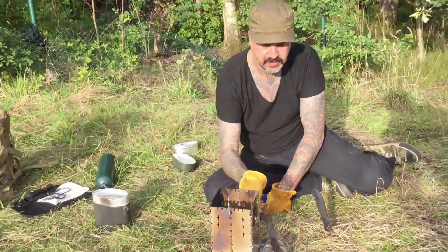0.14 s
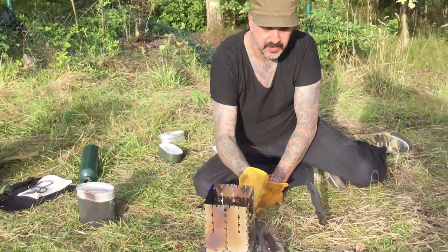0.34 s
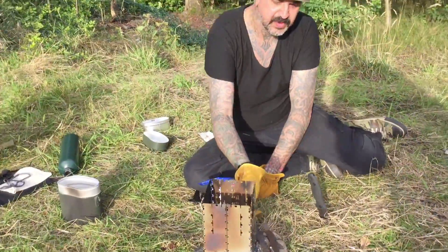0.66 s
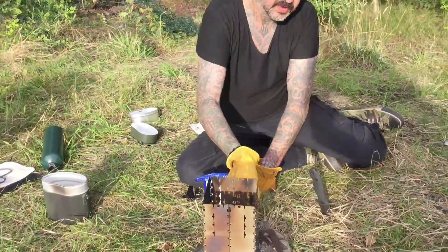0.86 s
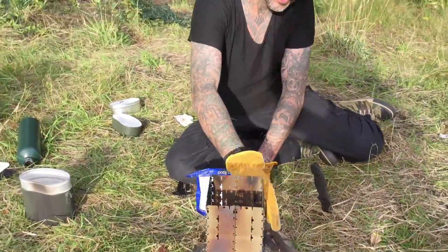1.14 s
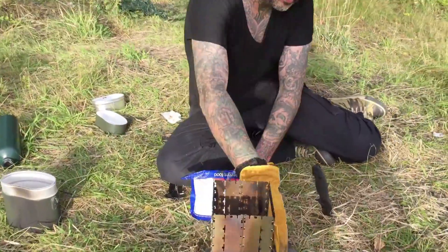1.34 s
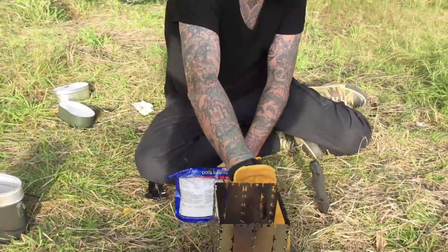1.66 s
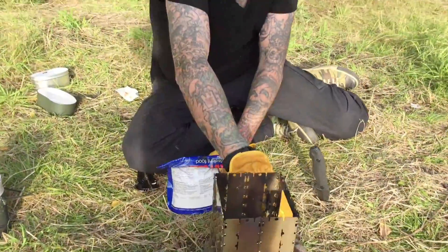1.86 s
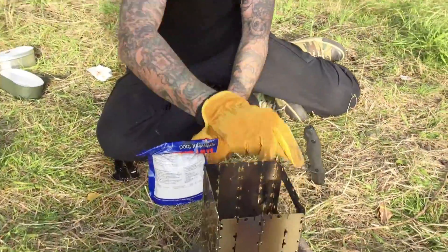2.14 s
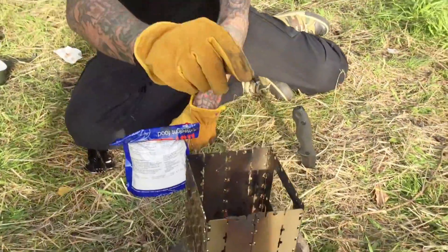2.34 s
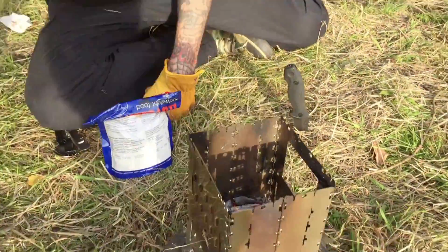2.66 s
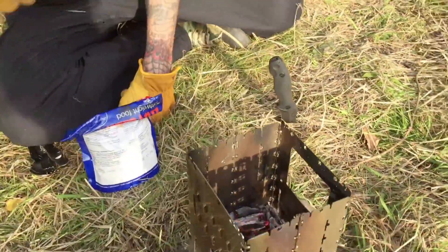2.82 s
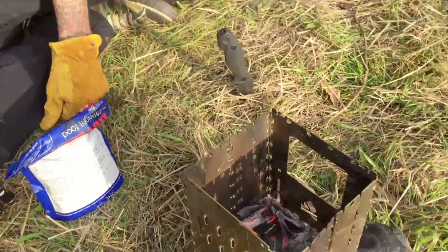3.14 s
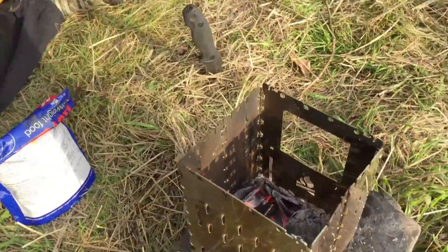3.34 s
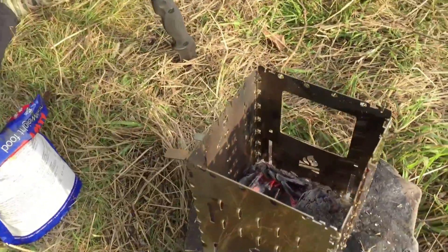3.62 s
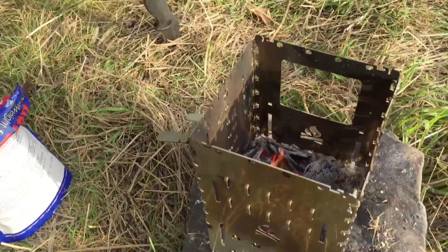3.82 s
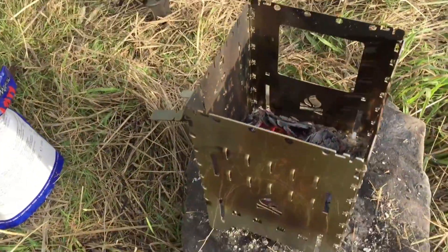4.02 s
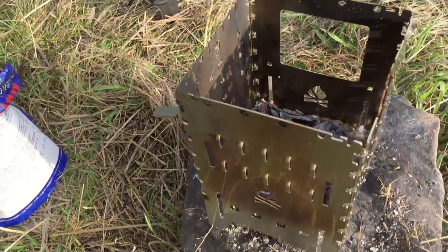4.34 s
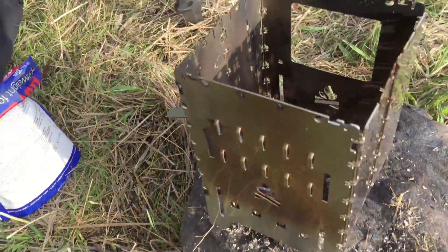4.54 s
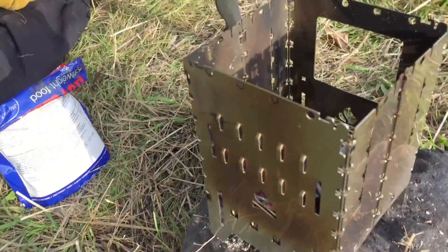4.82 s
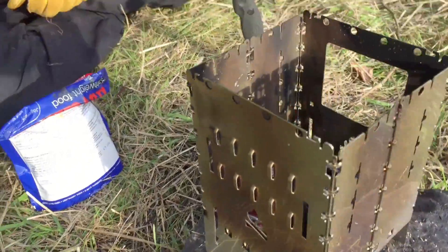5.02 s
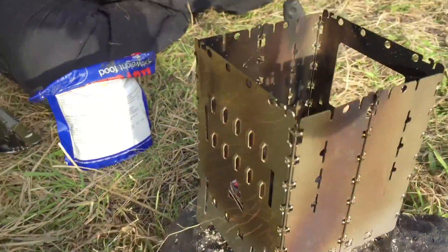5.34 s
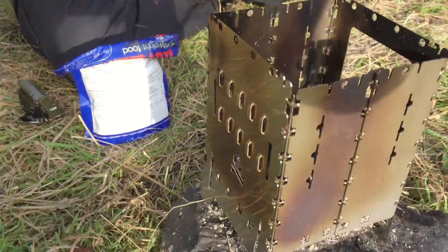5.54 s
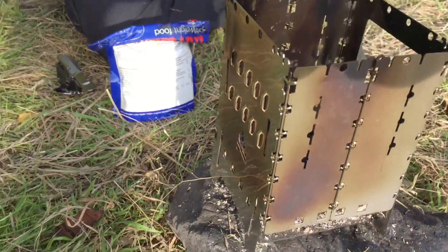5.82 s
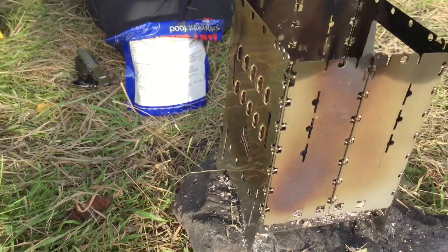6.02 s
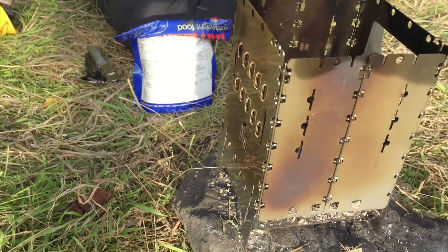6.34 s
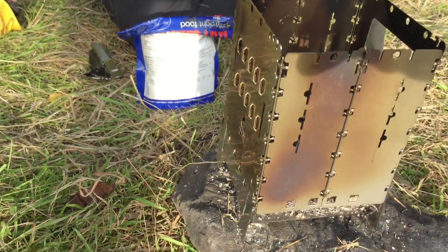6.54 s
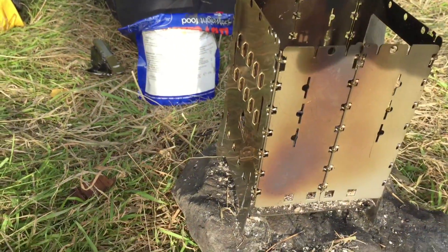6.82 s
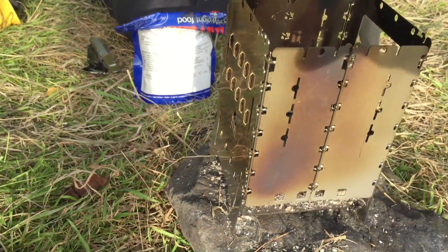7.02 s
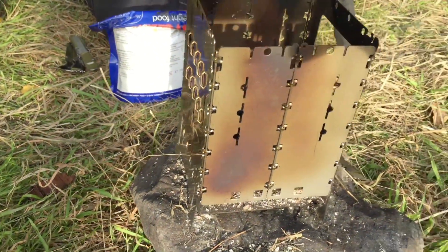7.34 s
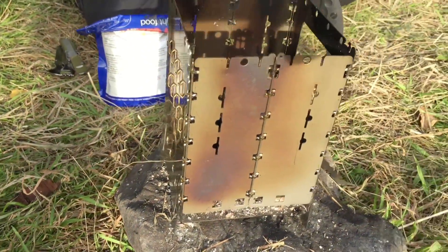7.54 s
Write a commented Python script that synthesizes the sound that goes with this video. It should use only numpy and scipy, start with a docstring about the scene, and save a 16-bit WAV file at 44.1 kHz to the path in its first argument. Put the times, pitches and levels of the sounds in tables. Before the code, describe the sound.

Close rustles, dull knocks and light metallic clinks in a grassy field full of insects and birdsong, the chorus slowly dying away over low traffic.

```python
"""In a meadow by a wood, heard through two capsules: a wide chorus of insects and echoing birds dies away.
Close by and dead ahead, gloved hands rustle, knock and clink a steel stove, embers tick, far traffic rumbles.
Insects, traffic, air and cloth are coloured noise; birds are gliding whistles scattered by the trees;
ticks are tiny snaps with a short body, knocks and clinks are decaying modes."""
import sys
import numpy as np
from scipy import signal
from scipy.fft import rfft, irfft, next_fast_len
from scipy.io import wavfile
from scipy.ndimage import uniform_filter1d, map_coordinates

SR = 44100
rng = np.random.default_rng(int(sys.argv[2]) if len(sys.argv) > 2 else 0)


def master_out(mix):
    """Clip the mix to full scale and print it as 16-bit PCM to the path in sys.argv[1]."""
    frames = np.transpose(np.atleast_2d(mix))
    ceiling = np.clip(frames, -1, 1)
    pcm = np.round(ceiling * 32767).astype(np.int16)
    wavfile.write(sys.argv[1], SR, pcm)


N = 338435
T = np.arange(N) / SR  # seconds


def amp(db):
    """dB to gain."""
    return 10 ** (np.asarray(db) / 20)


def unit(x):
    """Scale to rms 1."""
    return x / np.sqrt(np.mean(x ** 2) + 1e-20)


def along(points, hz):
    """Read (Hz, value) points on a log frequency axis."""
    f, v = np.transpose(points)
    return np.interp(np.log(hz + 1), np.log(f + 1), v)


def curves(rows):
    """One value per sample for each column after the time."""
    s, *cols = np.transpose(rows)
    return [np.interp(T, s, c) for c in cols]


def wobble(rate, size=N):
    """A smooth random curve, rate knots a second."""
    knots = rng.standard_normal(int(size * rate / SR) + 4)
    return map_coordinates(knots, [np.arange(size) * rate / SR])


def sine(hz, t, phase=0):
    """A steady tone with an optional moving phase in radians."""
    return np.sin(2 * np.pi * hz * t + phase)


def gliding_sine(hz):
    """A tone whose frequency changes from sample to sample."""
    return np.sin(2 * np.pi * np.cumsum(hz) / SR)


def filtered(x, response):
    """x times a response of frequency."""
    m = next_fast_len(N + SR // 2)
    return irfft(rfft(x, m) * response(np.fft.rfftfreq(m, 1 / SR)), m)[..., :N]


def rush(spectrum, patchy_db, channels=1, grain_db=0):
    """Coloured noise of rms 1 with patches of random gain; grain makes single samples stand out."""
    grain = amp(grain_db * rng.exponential(size=(channels, N)))
    white = rng.standard_normal((channels, N)) * grain
    z = signal.stft(white, nperseg=512)[2]
    field = rng.standard_normal(z.shape[1:])
    field = uniform_filter1d(uniform_filter1d(field, 5, 0), 10, 1)  # over frequency, then time
    x = signal.istft(z * amp(patchy_db * unit(field)), nperseg=512)[1][:, :N]
    return unit(filtered(x, lambda hz: amp(along(spectrum, hz))))


def add(track, s, sound):
    """Mix a sound in at s seconds."""
    part = track[..., round(s * SR):][..., :sound.shape[-1]]
    part += sound[..., :part.shape[-1]]


# Colour of the open air. Each row: frequency in Hz, relative level per hertz in dB.
AIR_SPECTRUM = [(150, -24), (250, -6), (297, -13), (347, -14), (543, -13), (668, -14.5), (754, -15),
                (1050, -11), (2750, -17), (4010, -19), (7590, -38), (11300, -23.5), (15300, -47),
                (15500, -70)]


def air():
    """A steady hiss, mostly common to both capsules; the part that differs lacks bass."""
    mid, side = rush(AIR_SPECTRUM, patchy_db=2.0, channels=2)
    side = amp(-12) * filtered(side, lambda hz: 1 / (1 + (330 / (hz + 1)) ** 4))
    return amp(-65.0) * np.array([mid + side, mid - side])


# Colour of the far rumble. Each row: frequency in Hz, relative level per hertz in dB.
RUMBLE_SPECTRUM = [(13, -37), (22, -32), (35, -8), (54, 7), (65, 7), (97, -5), (130, -4), (170, -59),
                   (290, -120)]
# Colour of the higher drone. Each row: frequency in Hz, relative level per hertz in dB.
DRONE_SPECTRUM = [(53, -6), (90, -2.5), (167, 3), (241, -7), (269, -11), (420, -21.5), (550, -76),
                  (920, -120)]
# Uneven level of the low rumble and drone. Each row: time in seconds, rumble level in dB, drone level in dB.
RUMBLE_LEVELS = [(0, -50.5, -58), (.6, -56.5, -58.5), (1.1, -57.5, -62.5), (1.9, -54.5, -60),
                 (2.5, -53, -60), (3, -55, -56), (3.6, -59, -61), (4.3, -51.5, -60), (4.48, -53, -60),
                 (4.56, -54, -53.5), (4.64, -57, -61.5), (5, -57, -60), (5.4, -56.5, -59),
                 (6, -53.5, -59.5), (6.6, -59, -60), (7.1, -56.5, -59.5), (7.67, -55, -55.5)]


def traffic():
    """Far traffic, alike at both capsules: a lumpy low rumble and a higher drone that shares some lumps."""
    lumps_db = 4 * wobble(11)
    rumble_db, drone_db = curves(RUMBLE_LEVELS)
    rumble = amp(rumble_db + lumps_db) * rush(RUMBLE_SPECTRUM, patchy_db=0.0)
    drone_level = amp(drone_db + 0.23 * lumps_db + 1.4 * wobble(9))
    return rumble + drone_level * rush(DRONE_SPECTRUM, patchy_db=3.5)


HUM_S, HUM_LENGTH_S, HUM_DB = 6.5, .75, -51  # level before the arch and throb
HUM_LOW_HZ, HUM_RISE_HZ = 136, 41.9
HUM_THROB_S, HUM_THROB_FIRST_S = 0.142, 7.08  # throb period, time of one throb peak


def hum():
    """One short low tone of no clear source: its pitch arches and wavers, its level throbs."""
    u = np.clip((T - HUM_S) / HUM_LENGTH_S, 0, 1)
    arch = np.sin(np.pi * u)
    throb = np.cos(np.pi * (T - HUM_THROB_FIRST_S) / HUM_THROB_S) ** 2
    hum_hz = HUM_LOW_HZ + HUM_RISE_HZ * arch + 10 * wobble(18)
    level = amp(HUM_DB) * arch ** 0.69 * (0.18 + throb) * amp(3.1 * wobble(15))
    return level * gliding_sine(hum_hz)


# Colour of the far chorus by the wood. Each row: frequency in Hz, relative level per hertz in dB.
WOOD_SPECTRUM = [(60, -120), (100, -20), (150, -16.5), (250, -8), (500, -11), (750, -10.5), (1600, -5),
                 (2250, 2), (2900, 0), (3300, 0.5), (3600, -2.5), (4000, -3), (4300, -120)]
# Swells of that far chorus. Each row: time in seconds, change of level in dB.
WOOD_SWELLS = [(0, -4), (.15, 2.5), (.6, 0.5), (.95, -0.5), (1.2, -0.5), (1.55, -2), (1.9, 1), (2.3, 0),
               (2.75, -1.5), (3.05, 2), (3.45, -0.5), (3.8, 3.5), (4.3, -1.5), (4.9, 0), (5.2, 0.5),
               (5.8, 1), (7.67, 7)]
WOOD_DB = -58  # each capsule's own part, before swells and fade


def wood_chorus():
    """The far chorus swells; its long waves reach both capsules alike, its short waves do not."""
    far = rush(WOOD_SPECTRUM, patchy_db=1.2, channels=3)
    shared = filtered(far[2], lambda hz: 1 / (1 + (hz / 1500) ** 4))
    level = amp(WOOD_DB + curves(WOOD_SWELLS)[0] + 0.49 * wobble(5.5))
    return level * (far[:2] + 1.71 * shared)


# Colour of the blurred crickets. Each row: frequency in Hz, relative level per hertz in dB.
CRICKET_SPECTRUM = [(3700, -120), (3850, -19), (4000, -8), (4090, 6), (4300, 6), (4600, 6.5), (4800, 1.5),
                    (4950, -19), (5100, 3), (5300, -120)]
# Colour of the blurred cicadas. Each row: frequency in Hz, relative level per hertz in dB.
CICADA_SPECTRUM = [(2910, -47), (4950, -21), (5290, -6), (6510, -3), (6960, -6.5), (7580, -7.5),
                   (8220, -17.5), (10000, -30), (12000, -41), (15300, -41), (15500, -70)]
# Wing resonances of the nearest insects.
# Each row: centre in Hz, width in Hz, gain in dB, the last two before the response is squared.
NEAR_WINGS = [(4125, 70, -2), (6410, 160, 0), (7335, 110, -4)]
CRICKET_DB, CICADA_DB = -54, -51.5  # full chorus, before balance and fade


def wing_response(hz):
    """Sum of wing resonances, squared to steepen the skirts."""
    total = 0
    for centre, width, db in NEAR_WINGS:
        damping = 1j * hz * width
        total = total + amp(db) * damping / (centre * centre - hz * hz + damping)
    return total ** 2


def insects():
    """Countless singers blur into bands, unrelated left and right; the nearest ones still pulse through."""
    throb_db = 0.68 * sine(5.2, T, 2.0 * wobble(1.47))  # wing strokes come in bouts
    buzz_db = 0.54 * sine(68, T, 3.3 * wobble(8.1))  # tymbal beat
    cricket_level = amp(CRICKET_DB + 0.15 * wobble(2.74) + throb_db)
    crickets = cricket_level * rush(CRICKET_SPECTRUM, patchy_db=1.5, channels=2)
    cicada_level = amp(CICADA_DB + buzz_db + 0.173 * wobble(7.5) + 0.13 * wobble(22.08))
    cicadas = cicada_level * rush(CICADA_SPECTRUM, patchy_db=1.33, channels=2)
    near_noise = unit(filtered(rng.standard_normal((2, N)), wing_response))
    near = amp(CICADA_DB - 4.5 + 2 * buzz_db) * near_noise
    return crickets + near + amp([[1.4], [-1.4]]) * cicadas


def whine():
    """A very faint, thin high tone, alike at both capsules, wavering in level and phase."""
    return amp(CICADA_DB - 41 + 2.8 * wobble(6)) * sine(15626, T, 1.2 * wobble(25))


def note(length, first_hz, last_hz, warble_hz, bend):
    """A gliding whistle; fast random warble smears it into a trill, a bend above 1 hurries the glide."""
    size = round(length * SR)
    u = np.arange(size) / (length * SR)
    hz = first_hz + (last_hz - first_hz) * (1 - (1 - u) ** bend)
    hz += warble_hz * wobble(220, size)
    hz += 18 * wobble(14, size)  # no bird holds a pitch straight
    swell = np.clip(u / 0.15, 0, 1) * np.clip((1 - u) / 0.3, 0, 1)
    swell *= amp(2.2 * wobble(40, size))
    swell *= unit(amp(warble_hz / 55 * wobble(170, size)))  # a warbling throat also rasps
    return np.sqrt(2) * swell * gliding_sine(hz)


# How long the wood rings. Each row: frequency in Hz, time to fall by 60 dB in seconds.
TREE_DECAY = [(500, 0.29), (2900, 1), (3700, 0.44), (8000, 0.28)]


def trees(x):
    """Trunks scatter each note into a noisy tail; each frequency dies at its own speed."""
    hz, t, z = signal.stft(rng.standard_normal((2, SR // 2)), SR, nperseg=256)
    decay = amp(-60 * t / along(TREE_DECAY, hz)[:, None])
    tail = signal.istft(z * decay, SR, nperseg=256)[1]
    return signal.fftconvolve(x[None], tail / np.linalg.norm(tail[0]), axes=1)


# Whistles. Each row: start in seconds, length in seconds, first and last pitch in Hz,
# level in dB before panning, depth of random warble in Hz, left-right balance in dB.
WHISTLE_NOTES = [(0.04, 0.062, 2895, 2860, -54, 40, -2), (0.065, 0.047, 3000, 3460, -51.5, 100, 0),
                 (0.093, 0.035, 2215, 2750, -49, 50, -1), (0.298, 0.03, 2750, 2600, -52, 80, 1),
                 (0.365, 0.1, 2610, 2650, -53, 35, 4), (0.316, 0.097, 3290, 3310, -54.5, 37, -1),
                 (0.44, 0.17, 2120, 2027, -61.5, 30, -6), (0.64, 0.08, 2717, 2745, -48, 47, 2),
                 (0.68, 0.068, 2090, 2060, -64, 40, -2), (0.705, 0.09, 2633, 2530, -51.5, 82, 0),
                 (0.805, 0.028, 2834, 2690, -50.5, 60, 0), (0.875, 0.033, 2897, 2620, -53, 59, 0),
                 (0.675, 0.046, 3110, 3160, -46.5, 65, 3), (0.76, 0.043, 3180, 3090, -55, 45, 0),
                 (0.92, 0.073, 2600, 2410, -54, 40, -1), (1.297, 0.2, 3157, 3050, -53.5, 66, 2),
                 (1.347, 0.088, 2630, 2656, -58, 31, -2), (1.36, 0.054, 3050, 3265, -50, 88, -3),
                 (1.778, 0.066, 2790, 2755, -56, 21, -6), (1.875, 0.025, 3320, 2950, -50, 90, 0),
                 (1.903, 0.057, 2880, 2773, -47.5, 58, 3), (1.99, 0.14, 2800, 2745, -54, 96, -3),
                 (1.949, 0.043, 3250, 2644, -47.5, 80, 3), (1.955, 0.056, 3210, 3180, -58, 56, -2),
                 (1.98, 0.075, 2280, 2210, -55, 71, -1), (2.11, 0.14, 2180, 2176, -65, 43, -4),
                 (2.365, 0.035, 3050, 3400, -50, 60, -2), (2.375, 0.045, 3200, 3250, -47.5, 84, 0),
                 (2.412, 0.042, 3290, 3660, -49.5, 8, 14), (2.446, 0.032, 3580, 3700, -44, 8, 15),
                 (2.454, 0.052, 2524, 2474, -48, 46, -3), (2.578, 0.064, 3860, 3740, -48, 6, 6),
                 (2.6, 0.05, 2530, 2580, -53, 51, -4), (2.646, 0.075, 3750, 3590, -44.5, 13, 8),
                 (2.73, 0.12, 2444, 2300, -55, 39, -1), (2.76, 0.1, 2706, 2750, -53, 70, 7),
                 (2.92, 0.044, 3150, 3440, -48.5, 80, 3), (2.955, 0.15, 3340, 3130, -56.5, 87, 0),
                 (2.985, 0.037, 2250, 2246, -52.5, 52, 0), (2.988, 0.073, 2540, 2574, -51, 35, 8),
                 (3.556, 0.13, 2830, 2860, -50.5, 47, -5), (4.198, 0.055, 1228, 1239, -49.5, 38, -9),
                 (4.115, 0.17, 1968, 1796, -56, 60, 0), (4.255, 0.19, 3570, 3580, -60, 15, 4),
                 (4.635, 0.075, 2400, 1780, -60, 27, -3), (5.535, 0.08, 3900, 3850, -56, 60, 3),
                 (2.52, 0.045, 4250, 3950, -57, 97, 3), (4.27, 0.12, 3065, 2950, -56, 83, -5),
                 (4.405, 0.13, 1950, 1904, -55.5, 120, -4), (4.325, 0.17, 2403, 2347, -56, 8, -7),
                 (4.613, 0.042, 1128, 1330, -51, 18, -5), (4.655, 0.099, 2785, 2753, -50, 36, -5),
                 (4.856, 0.074, 2770, 2750, -52, 48, 1), (5.065, 0.049, 2390, 2485, -50, 36, -2),
                 (5.24, 0.088, 3170, 3360, -51, 36, 6), (5.305, 0.063, 2660, 2703, -48.5, 30, 1),
                 (5.41, 0.051, 2175, 2013, -50.5, 26, -4), (5.555, 0.066, 2636, 2095, -51, 38, 7),
                 (5.96, 0.18, 2850, 2790, -49, 39, 0), (6.49, 0.11, 2042, 2060, -51, 10, 6),
                 (6.54, 0.045, 2716, 2950, -44, 70, 4), (6.67, 0.063, 2830, 3330, -49.5, 40, 0),
                 (6.863, 0.12, 2780, 2630, -44, 97, 2)]
# Blurred trills. Each row: start in seconds, length in seconds, first and last pitch in Hz,
# level in dB before panning.
TRILL_NOTES = [(0.108, 0.07, 2800, 2650, -52), (0.119, 0.094, 3500, 3210, -58),
               (0.159, 0.06, 2400, 2436, -54.5), (0.8, 0.11, 2775, 2740, -55),
               (0.799, 0.16, 2873, 2300, -50.5), (1.265, 0.07, 3350, 3185, -47.5),
               (2.444, 0.2, 3315, 3320, -54.5), (2.757, 0.2, 2556, 2670, -58),
               (2.895, 0.35, 2590, 2416, -55), (3.018, 0.098, 2996, 2960, -50.5),
               (3.287, 0.032, 3000, 2960, -53), (3.622, 0.12, 2620, 2498, -53.5),
               (3.626, 0.059, 3250, 3150, -59), (4.299, 0.087, 1819, 1835, -63),
               (4.704, 0.208, 2920, 2830, -59), (5.055, 0.15, 2200, 2270, -51),
               (5.067, 0.1, 3510, 3270, -52), (5.229, 0.078, 2880, 2950, -51.5),
               (5.505, 0.058, 2750, 2825, -45.5), (5.829, 0.12, 2535, 2120, -54)]
TRILL_WARBLE_HZ = 190.6
# Three birds that each repeat one call. Columns: length in seconds, first and last pitch in Hz,
# depth of random warble in Hz, left-right balance in dB.
PIPE_CALL = (0.2, 2098, 2085, 14, 0)
SLIDE_CALL = (0.14, 2130, 1740, 80, -4)
CHIP_CALL = (0.06, 3950, 3380, 105, 5)
# When those birds call. Each row: start in seconds, level in dB before panning.
PIPE_TIMES = [(4.71, -54.5), (5.275, -54), (5.61, -52.5), (5.7, -54), (6.035, -51)]
SLIDE_TIMES = [(4.7, -57), (5.14, -50)]
CHIP_TIMES = [(0.153, -52.5), (0.903, -54), (5.57, -53), (5.865, -51), (6.293, -48.5), (6.845, -51)]


def whistling_birds():
    """Every note arrives directly, a moment apart at the two capsules, and again through the trees."""
    out = np.zeros((2, N))
    song = list(WHISTLE_NOTES)
    song += [(*row, TRILL_WARBLE_HZ, 0) for row in TRILL_NOTES]
    callers = [(PIPE_CALL, PIPE_TIMES), (SLIDE_CALL, SLIDE_TIMES), (CHIP_CALL, CHIP_TIMES)]
    for call, times in callers:
        song += [(s, *call[:3], db, *call[3:]) for s, db in times]
    for s, length, first_hz, last_hz, db, warble_hz, pan_db in song:
        x = amp(db) * note(length, first_hz, last_hz, warble_hz, bend=0.98)
        add(out[0], s, amp(pan_db / 2 - 2.2) * x)
        add(out[1], s + .00003, amp(-pan_db / 2 - 4.0) * x)
        add(out, s + .012, amp(-5) * trees(x))
    return out


# Falling notes of a lower bird. Each row: start in seconds, first and last pitch in Hz, level in dB.
CLUCK_NOTES = [(2.853, 1444, 820, -62), (3.055, 1280, 890, -60.5), (3.09, 1318, 990, -56),
               (3.108, 990, 976, -58), (3.178, 1657, 867, -56.5), (3.195, 2187, 1498, -55),
               (3.311, 1450, 976, -50), (3.551, 1392, 965, -50), (3.737, 2400, 996, -47.5),
               (3.817, 1306, 874, -52), (3.895, 2290, 952, -49.5), (4.052, 960, 942, -55),
               (4.235, 1260, 952, -52), (4.445, 1270, 927, -54), (4.645, 1310, 942, -52.5),
               (5.042, 1250, 942, -49), (5.488, 1676, 950, -52.5)]
CLUCK_S, HOOK_HZ = .05, 850  # note length; the smaller the fall, the sooner it levels off


def clucking_bird():
    """Short falling notes reach the right capsule first, then bounce off the ground and the trees."""
    out = np.zeros((2, N))
    for s, first_hz, last_hz, db in CLUCK_NOTES:
        bend = 1 + HOOK_HZ / (first_hz - last_hz)
        x = amp(db) * note(CLUCK_S, first_hz, last_hz, warble_hz=25, bend=bend)
        add(out[0], s + 0.00065, x)
        add(out[1], s, x)
        add(out, s + 0.0095, amp(-9) * x)  # off the ground
        add(out, s + 0.016, amp(-11) * trees(x))
    return out


FADE_FROM_S, FADE_TO_S, FADE_BEND = 4.38, 7.96, 1.85  # dies away as (time left) ** bend
BLINK_FROM_S, BLINK_TO_S, BLINK_DB = 1.1583, 1.1733, -22  # drops out for a blink


def meadow():
    """The wide chorus of insects and birds, with one brief drop in level, slowly dying away."""
    fade = np.clip((FADE_TO_S - T) / (FADE_TO_S - FADE_FROM_S), 0, 1) ** FADE_BEND
    blink = (T > BLINK_FROM_S) & (T < BLINK_TO_S)
    shoulder = 1 - 0.4 * np.exp(-abs(T - BLINK_TO_S) / 0.006)  # a softer dip around the blink
    dip = np.where(blink, amp(BLINK_DB), shoulder)
    chorus = (insects() + wood_chorus()) * amp([[.8], [-.8]])
    return (chorus + whine() + whistling_birds() + clucking_bird()) * fade * dip


# Faint steady stirring of grass. Each row: time in seconds, level in dB.
GRASS_STIRRING = [(0.0, -70), (0.43, -64.5), (2.07, -65), (3.8, -67), (5.79, -73), (7.67, -74.5)]
# Strokes of glove and bag. Each row: start in seconds, length in seconds,
# level of the hiss in dB, level of the hollow scrape in dB.
GLOVE_STROKES = [(0.255, 0.212, -62, -73), (0.46, 0.063, -50, -50), (0.547, 0.093, -81, -73),
                 (0.702, 0.081, -66.5, -77.5), (0.796, 0.15, -56, -53.5), (1.025, 0.085, -57, -54.5),
                 (1.272, 0.049, -62, -61), (1.339, 0.025, -48, -47.5), (1.35, 0.042, -60, -53),
                 (1.498, 0.035, -65, -72), (1.6, 0.18, -62.5, -60), (1.745, 0.11, -58.5, -51),
                 (1.829, 0.092, -51.5, -50.5), (1.97, 0.19, -63, -59), (2.26, 0.061, -55, -59),
                 (2.319, 0.068, -66, -74), (2.557, 0.053, -57, -51), (2.85, 0.13, -56, -57),
                 (3.033, 0.059, -70, -64), (3.545, 0.15, -83, -68), (3.705, 0.16, -62, -61),
                 (5.606, 0.12, -75, -81), (6.64, .04, -76, -82)]
# Colour of the hiss. Each row: frequency in Hz, relative level per hertz in dB.
CLOTH_SPECTRUM = [(1500, -120), (2500, -1.5), (5000, 5.5), (9000, 2), (14800, 1), (15350, 1), (15450, -120)]
# Colour of the hollow scrape. Each row: frequency in Hz, relative level per hertz in dB.
HOLLOW_SPECTRUM = [(500, -120), (800, -12.5), (1100, -4), (1400, -9), (1800, -1.5), (2300, -4.5),
                   (3500, -6), (5000, -19), (7000, -120)]


def rustle():
    """Over stirring grass, each stroke starts fast and thins out; it hisses and scrapes a hollow body."""
    hiss = amp(curves(GRASS_STIRRING)[0] + 2.3 * wobble(3.37))
    scrape = np.zeros(N)
    for s, length, hiss_db, scrape_db in GLOVE_STROKES:
        u = np.arange(round(length * SR)) / (length * SR)
        stroke = np.clip(u / 0.18, 0, 1) * np.clip((1 - u) / 0.5, 0, 1)
        add(hiss, s, amp(hiss_db) * stroke)
        add(scrape, s, amp(scrape_db) * stroke)
    cloth = rush(CLOTH_SPECTRUM, patchy_db=1, grain_db=2)[0]
    hollow = rush(HOLLOW_SPECTRUM, patchy_db=4, grain_db=2.5)[0]
    roughness = unit(amp(2.5 * wobble(250)))
    return hiss * cloth + scrape * roughness * hollow


HIT_T = np.arange(SR // 3) / SR  # seconds since a hit

# Dry ticks. Each row: start in seconds, level in dB, body relative to snap in dB,
# both before the fixed gains of snap and body.
TICK_HITS = [(0.4695, -35, -6), (0.474, -39, -1), (0.482, -43, -3), (0.7123, -47, -7), (0.7297, -25, -31.5),
             (0.821, -42, -15), (0.8385, -38, -15), (0.7444, -56.5, 0), (1.0955, -49, 13), (1.284, -38, -1),
             (1.342, -42, -13), (1.9946, -46, 2), (2.278, -18.5, -37), (2.3328, -30, -22),
             (2.5657, -41.5, 14), (2.5752, -34, 9), (2.858, -43, 0), (3.045, -49, -2), (5.6116, -49, 2),
             (5.6511, -43, -13), (6.269, -61.5, 11.5), (6.652, -32.5, -31), (6.7052, -53, -8),
             (7.2153, -42, -20), (7.4584, -48, -15)]


def ticks():
    """A noisy snap and a very short 2500 Hz body; small bodies radiate no bass."""
    out, t = np.zeros(N), HIT_T
    for s, db, body_db in TICK_HITS:
        clicks = np.diff(np.sign(rng.standard_normal(len(t) + 2)), 2)
        snap = amp(-60 * t / 0.0067) * clicks
        body = amp(body_db - 60 * t / 0.0014) * (1 - np.exp(-t / 0.0000964)) * sine(2500, t)
        add(out, s, amp(db) * (0.37 * snap + 4.6 * body))
    return filtered(out, lambda f: (1j * f / (900 + 1j * f)) ** 2 / (1 + (f / 13500) ** 6))


# Dull knocks. Each row: start in seconds, level in dB before onset and decay, pitch in Hz.
KNOCK_HITS = [(0.172, -50, 2220), (0.812, -46, 3800), (1.048, -45, 3780), (2.333, -44.5, 1000),
              (0.265, -38.5, 1540), (0.298, -40.5, 920), (0.473, -35.5, 3480), (0.473, -38, 1280),
              (0.481, -36, 3780), (0.806, -48, 1080), (0.812, -45, 1700), (0.845, -39, 1820),
              (1.043, -39.5, 1760), (1.056, -42, 1700), (1.068, -41, 1810), (1.093, -46, 1930),
              (1.279, -39.5, 1780), (1.342, -42, 1760), (1.351, -42, 1180), (1.374, -37.5, 1850),
              (1.47, -48, 505), (1.744, -29.5, 1730), (1.757, -37, 1900), (1.768, -36, 1800),
              (1.783, -39, 1660), (1.799, -33.5, 1780), (1.848, -40, 4240), (1.849, -42, 2100),
              (1.856, -32.5, 4260), (1.861, -28.5, 1974), (1.865, -35, 1960), (1.873, -33, 1730),
              (2.069, -45, 1100), (2.084, -42, 620), (2.086, -35.5, 906), (2.09, -46, 1350),
              (2.097, -37, 1070), (2.113, -45, 970), (2.333, -42, 1900), (2.874, -46, 1780),
              (3.053, -42, 1610), (3.217, -41, 1635), (3.75, -46, 615), (7.295, -48, 357)]
KNOCK_T60_S = 0.029


def knocks():
    """A quickly damped mode: a pure tone plus its twin with a fast random phase."""
    out, t = np.zeros(N), HIT_T
    for s, db, hz in KNOCK_HITS:
        pair = sine(hz, t) + 0.63 * sine(hz, t, 3 * wobble(302, len(t)))
        add(out, s, amp(db - 60 * t / KNOCK_T60_S) * (1 - np.exp(-t / 0.0019)) * pair)
    return out


# Clinks of the stove. Each row: start in seconds, level in dB before the modes are weighted.
CLINK_HITS = [(0.808, -49), (0.822, -45), (0.839, -37.5), (0.861, -51), (1.03, -63), (1.048, -50),
              (1.066, -52), (1.282, -49.5), (1.342, -44.5)]
# Modes of thin steel. Each row: frequency in Hz, mean level in dB, time to fall by 60 dB in seconds.
STEEL_MODES = [(6520, -5, .1), (8050, -7, .12), (8550, -10, .08), (9810, -7, .16), (10200, -5, .1),
               (10900, -11, .08), (11800, 2, .18), (12810, -8, .22), (13790, -3, .2), (15010, -2, .15)]


def clinks():
    """Thin steel jangles in many modes, each struck a little differently every time."""
    out, t = np.zeros(N), HIT_T
    chatter = np.exp(-t / 0.049)  # loose panels keep touching at first, which blurs each mode
    for s, db in CLINK_HITS:
        ring = np.zeros(len(t))
        for hz, level_db, t60 in STEEL_MODES:
            struck_db = level_db + rng.normal(0, 2.9)
            mode_db = struck_db - 60 * t / t60 + 3.1 * chatter * wobble(85, len(t))
            ring += amp(mode_db) * sine(hz, t, 1.3 * chatter * wobble(140, len(t)))
        add(out, s, amp(db) * (1 - np.exp(-t / 0.01)) * ring)
    return out


def scene():
    """The wide, fading meadow around a nearly centred foreground."""
    background = air() + traffic() + hum()
    foreground = rustle() + ticks() + knocks() + clinks()
    return background + meadow() + foreground * amp([[.25], [-.25]])


def record(dry):
    """The microphone loses the lowest bass; nothing is kept above 15900 Hz."""
    return filtered(dry, lambda hz: (hz < 15900) / np.sqrt(1 + (36 / (hz + 1)) ** 8))


dry = scene()
out = record(dry)
master_out(out)
```